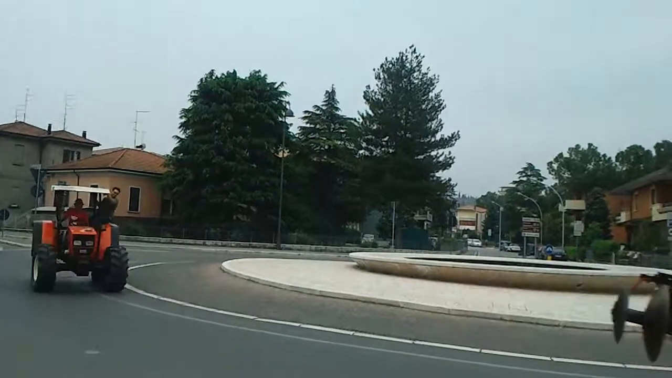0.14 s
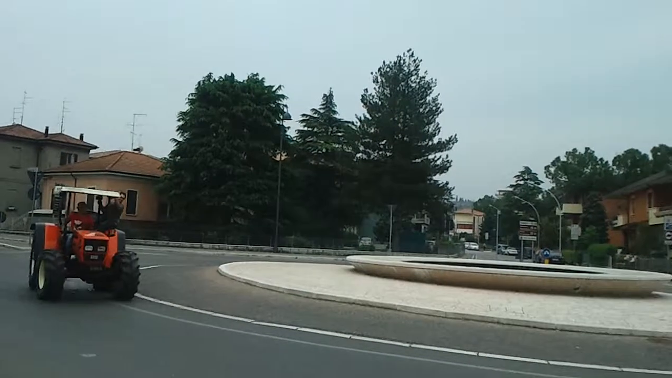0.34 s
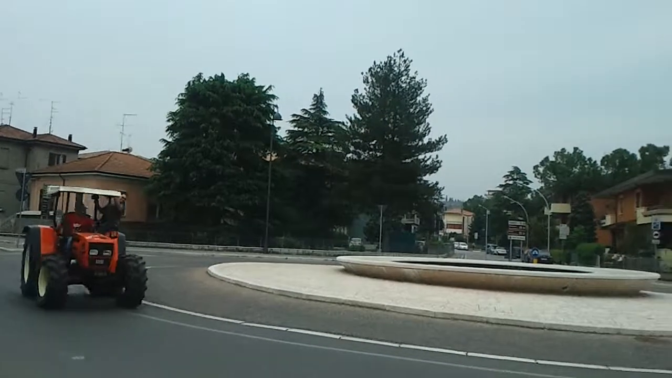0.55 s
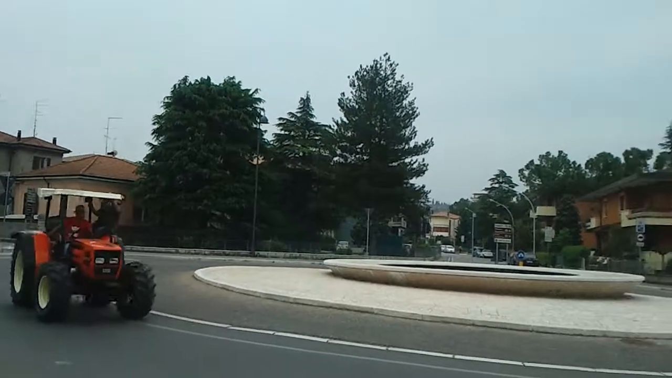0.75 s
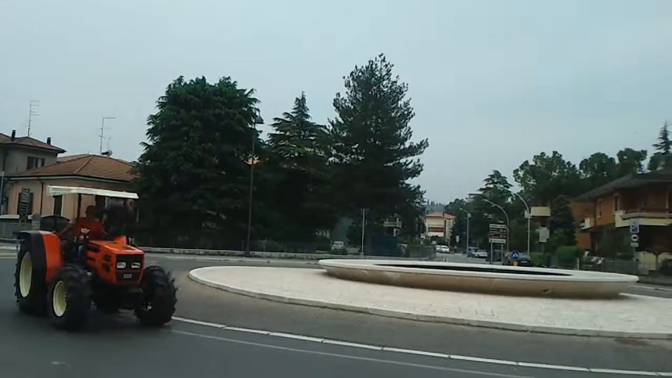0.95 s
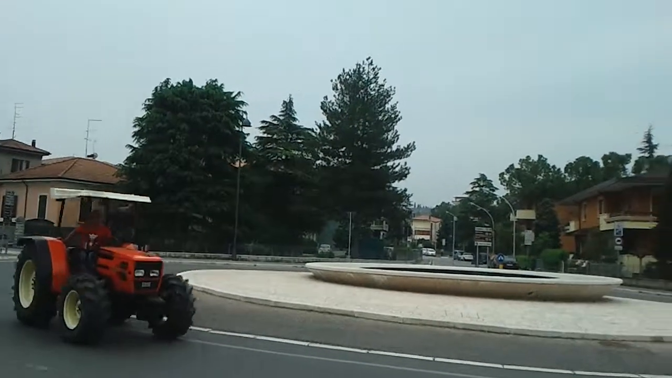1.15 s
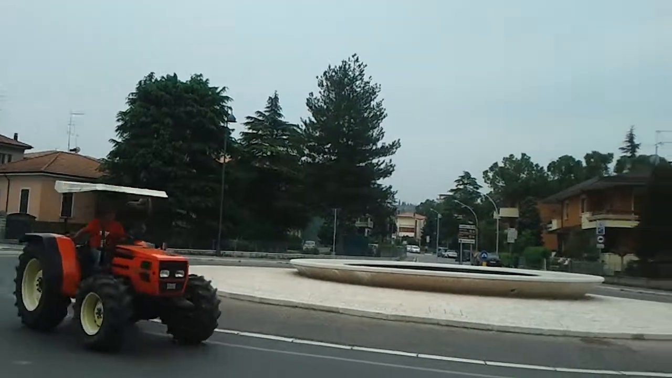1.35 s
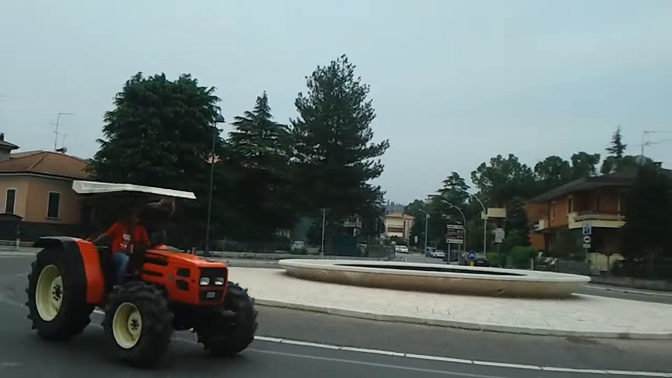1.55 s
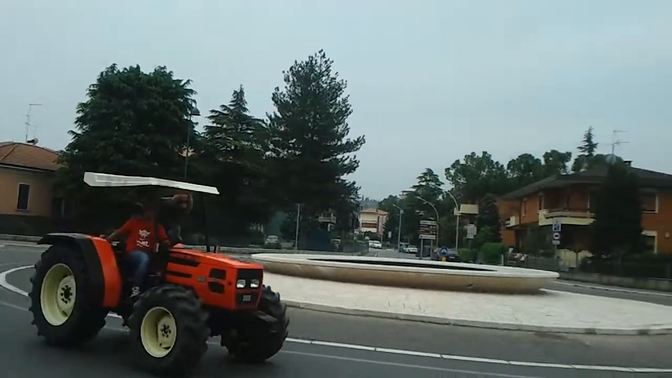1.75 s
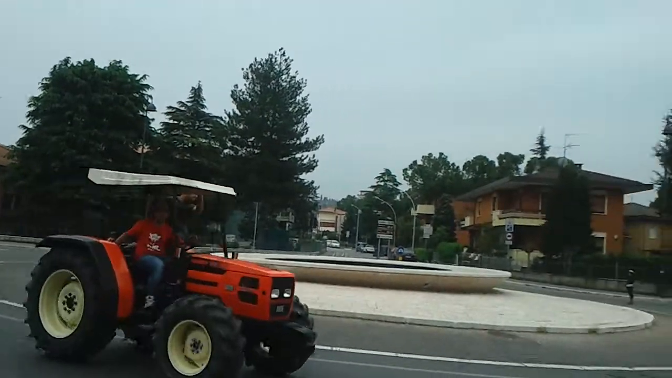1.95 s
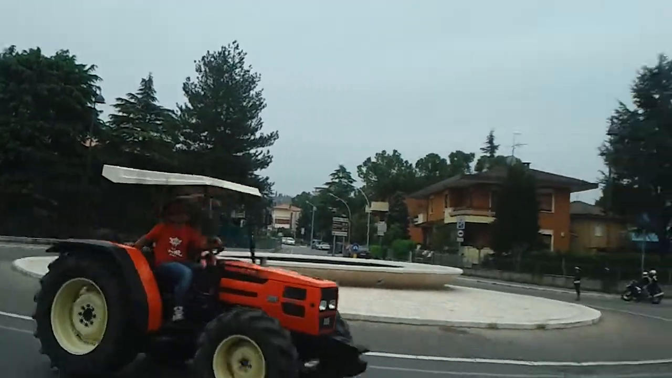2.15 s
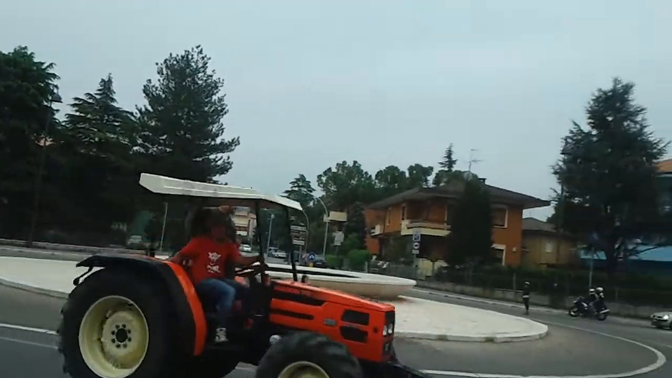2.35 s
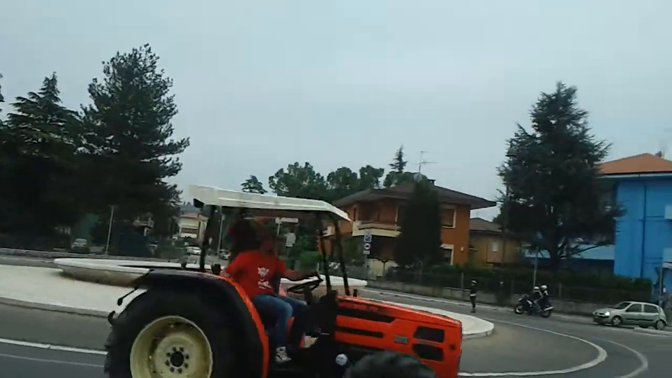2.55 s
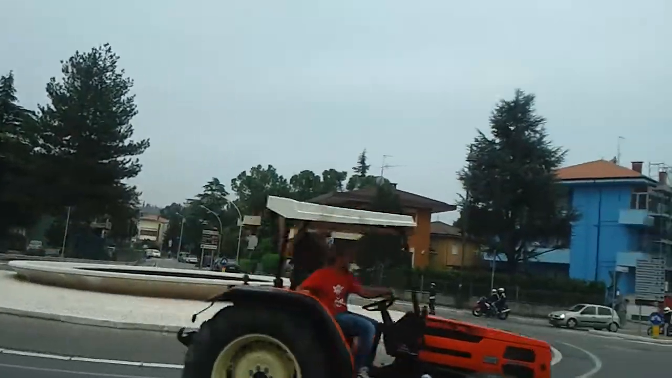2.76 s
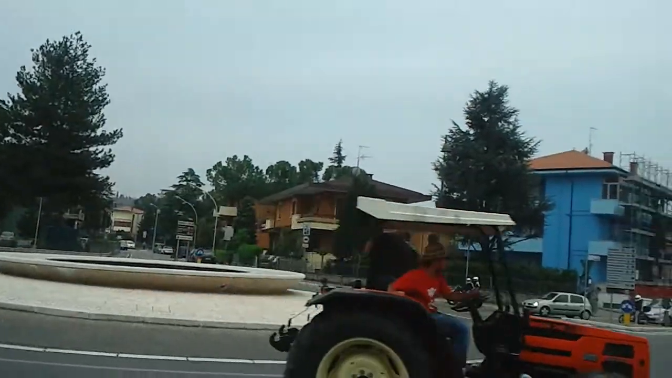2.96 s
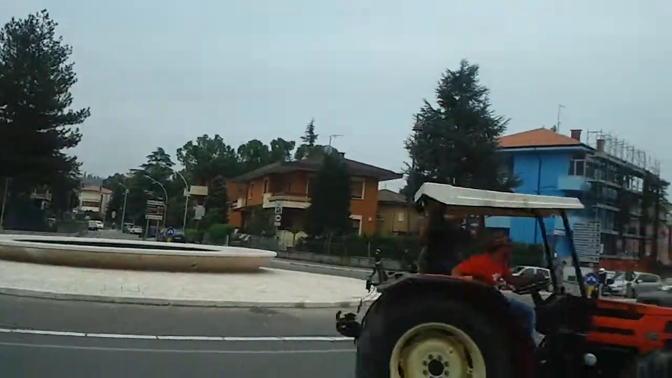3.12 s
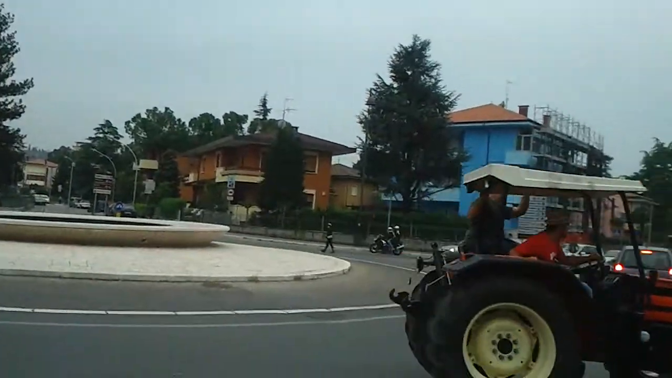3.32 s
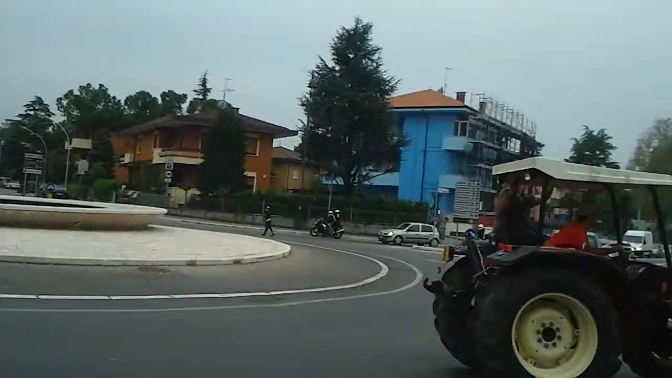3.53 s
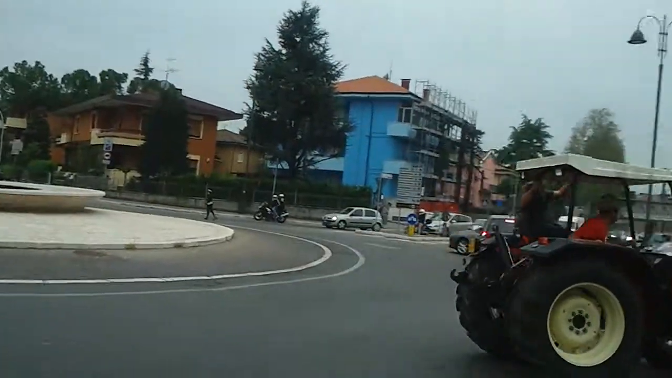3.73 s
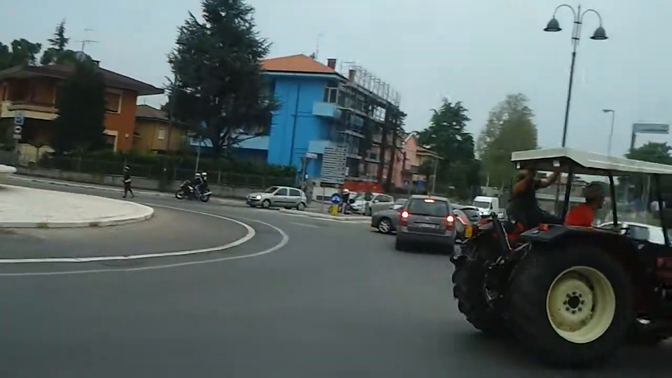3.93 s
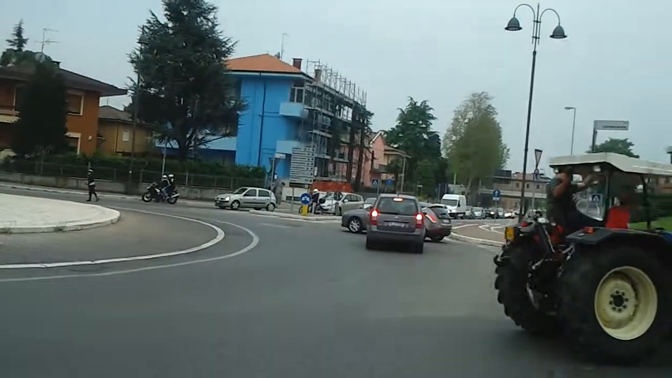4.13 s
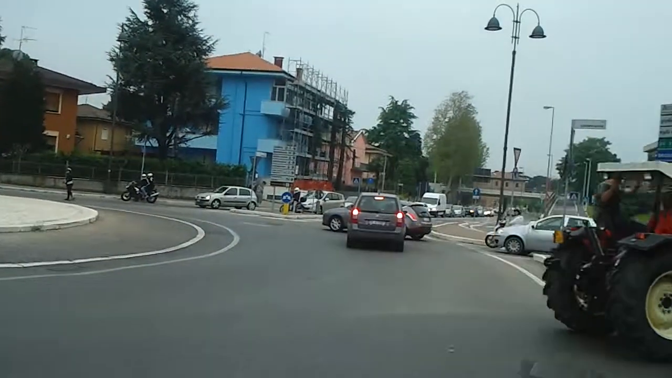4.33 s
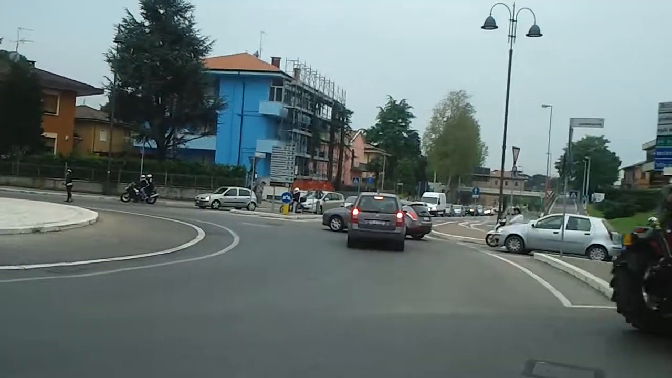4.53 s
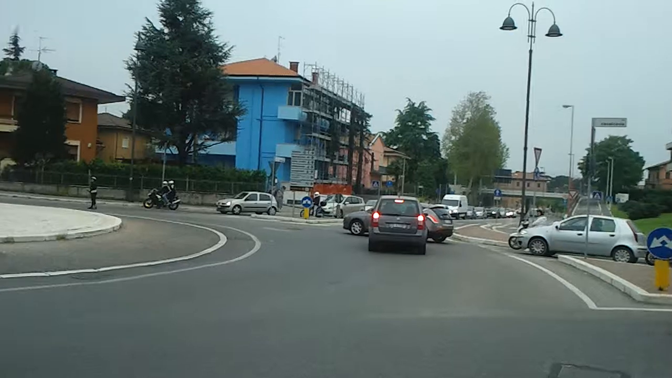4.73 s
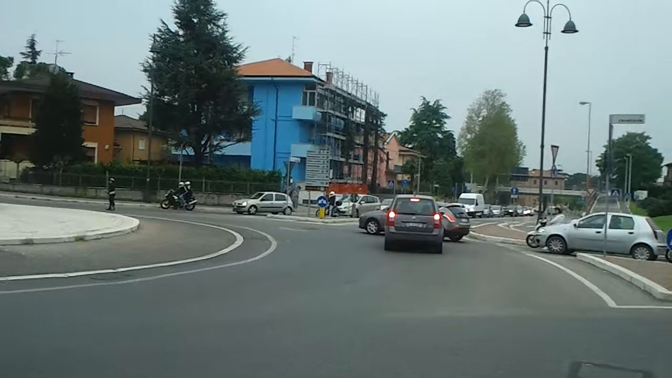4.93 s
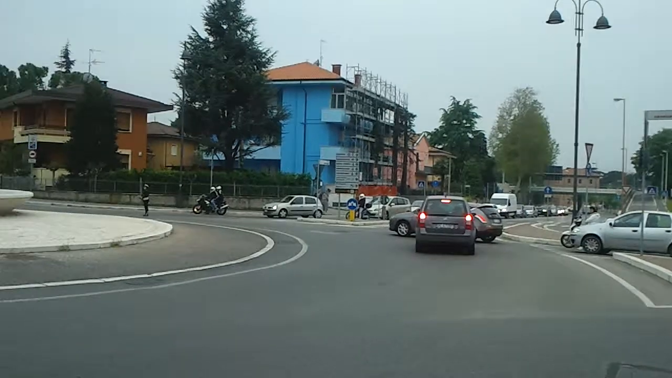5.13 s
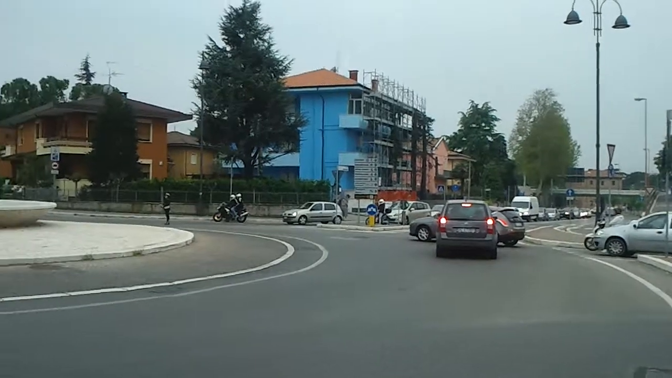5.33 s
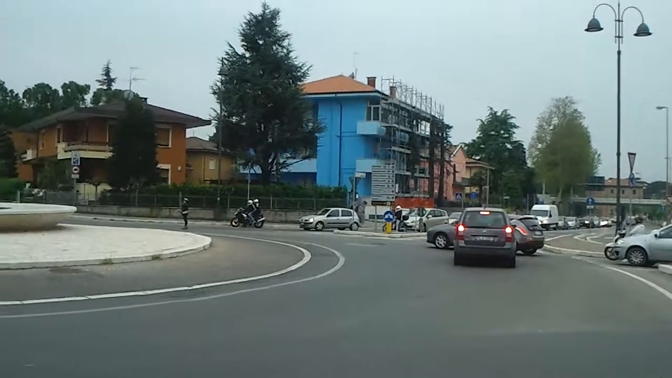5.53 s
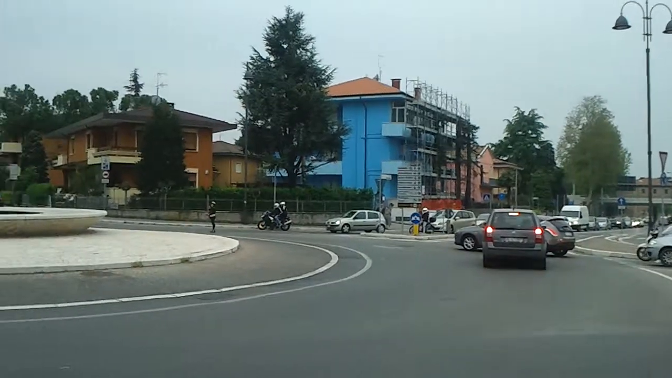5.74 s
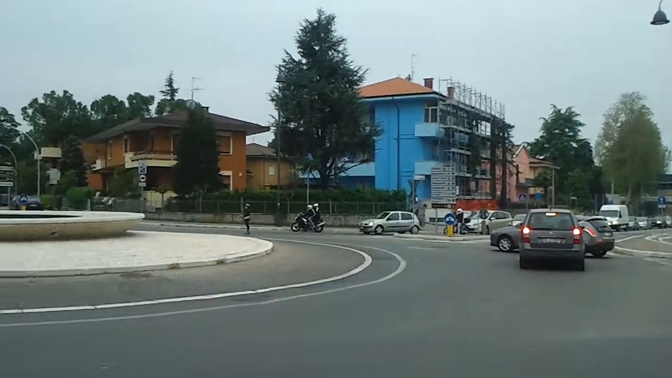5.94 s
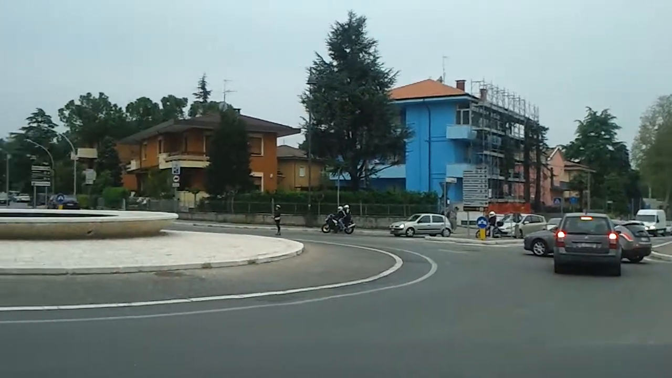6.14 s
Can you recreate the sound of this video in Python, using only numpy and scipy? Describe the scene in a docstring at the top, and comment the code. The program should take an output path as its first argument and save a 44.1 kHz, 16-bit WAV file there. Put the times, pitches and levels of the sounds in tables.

```python
"""Two diesel tractors passing

One tractor has just gone by: a nearly steady drone of exhaust harmonics, fading with distance.
A slower three-cylinder revs up, passes close and eases off: exhaust thumps, filtered noise for the
clattering block, sine whines for the gears. The engine notes beat together, ironwork clinks, the hitch
clanks once, distant traffic lies underneath, and the microphone input flattens the highest peaks."""
import sys
import numpy as np
from scipy import signal
from scipy.fft import rfft, irfft
from scipy.io import wavfile
from scipy.ndimage import uniform_filter1d, map_coordinates

SR = 44100
rng = np.random.default_rng(int(sys.argv[2]) if len(sys.argv) > 2 else 0)


def unload_audio(sound):
    """Save the sound as a 16-bit wav file, at the path given as the first command line argument."""
    columns = np.transpose(np.atleast_2d(sound))
    # keep every value between -1 and 1, then stretch to whole-number steps
    steps = np.round(np.clip(columns, -1, 1) * 32767)
    wavfile.write(sys.argv[1], SR, steps.astype(np.int16))


N = 276948
TIME = np.arange(N) / SR

# How the passing tractor is driven: (time [s], mean firing rate [Hz], throttle [0-1])
DRIVE = [(0, 43.23, .7), (.55, 42.64, .7), (.9, 40.85, .58), (1.15, 41.61, .65), (1.4, 43.1, .93),
         (1.75, 44.67, .74), (2, 45.03, .75), (2.3, 46.37, .92), (2.45, 48.07, 1), (2.58, 49.9, 1),
         (2.69, 50.6, .92), (2.76, 49, .3), (2.9, 47.1, .15), (3.2, 46.35, .2), (3.6, 43.21, .2),
         (3.85, 43.25, .74), (4.2, 41.98, .55), (4.5, 42.03, .38), (5.1, 41.35, .25), (5.55, 40.98, .2),
         (5.9, 42.19, .85), (6.28, 44.54, .6)]
# Its straight path past the microphone
CLOSEST_S, DISTANCE_M, SPEED_M_PER_S = 2.647, 5, 5.08
# Parts of its sound: (level abreast at full throttle [dB], change with throttle shut [dB],
# change towards straight ahead [dB], change towards straight behind [dB])
THUMP = [(-23, -0.5, -1.5, -8), (-15.5, -21, 3.5, -20), (-14, -23, -0.5, -0.5)]  # one row each for exhaust harmonics 1, 2 and 3
BARK = (-20.5, -13, -18, -10)  # gain of the upper exhaust harmonics
GAS = (-31.7, 1, -2.5, 0)
BODY = (-21.5, -3.5, 0.5, 2)
RATTLE = (-26, -3.5, -1.5, -10)
# Upper exhaust harmonics within the bark: (multiple of firing rate, relative level [dB])
OVERTONES = [(4, 1.5), (5, -2.5), (6, -5.5), (7, -10.5), (8, -14), (9, -17.5)]
LOW_CUT_HZ = 33  # the lowest harmonics run ahead in phase, as behind a low-cut here
THUMP_EARLY, KNOCK_LATE, CHUFF_LATE = .14, .09, .27  # timing, in shares of a firing
PUFF_DEPTH = .35  # pulsing of the gas at full throttle
KNOCK_IDLE, KNOCK_LOAD = 0.092, .16  # relative knock: throttle shut, and added at full throttle

# When each side faces the microphone, in the order used by block_colour: (time [s])
VIEW_TIMES = [.2, 1.2, 2.45, 3.2, 4.15, 5.0]
# Clatter colour from each side: (frequency [Hz], relative level per Hz [dB])
LEAD_REAR_COLOUR = [(310, -37), (520, -6), (702, -1), (937, -6.5), (1070, -0.5), (1240, -4.5), (1350, -5),
                    (1510, -5), (1730, -6), (1990, -10), (2410, -8), (3080, -14), (4290, -11),
                    (6190, -18.5), (7400, -34), (9620, -70), (16300, -120)]
FRONT_COLOUR = [(310, -34), (520, -10.5), (568, -14.5), (614, -4), (867, -0.5), (1210, -5.5), (1670, -1.5),
                (2110, -7.5), (2440, -5.5), (3220, -13), (4200, -6.5), (6060, -17.5), (7400, -38),
                (9620, -76.5), (16300, -120)]
FLANK_COLOUR = [(310, -48.5), (520, -19.5), (608, -5.5), (980, -1.5), (1120, -4), (1690, -8.5),
                (2410, -4.5), (3110, -10), (3400, -6), (3670, -9.5), (4490, -9), (6190, -18), (7400, -33.5),
                (9620, -77), (16300, -120)]
WHEEL_SIDE_COLOUR = [(310, -31.5), (520, -8.5), (776, -8.5), (1100, -4.5), (1560, -14.5), (1910, -11.5),
                     (2250, -14), (2550, -18), (3290, -11), (4150, -12.5), (4850, -15), (6620, -29),
                     (7400, -37), (9620, -71), (16300, -120)]
REAR_COLOUR = [(310, -27), (520, 2), (664, -4.5), (802, 2), (857, -6.5), (980, -1), (1870, -0.5),
               (2230, -4), (2880, -4.5), (3180, -20.5), (3970, -15), (7000, -31), (7400, -40), (9620, -66),
               (16300, -120)]
FAR_COLOUR = [(310, -32), (520, -4.5), (694, -8.5), (916, -5), (991, -9.5), (1240, -8.5), (1490, -7),
              (1850, -5.5), (2600, -8), (3630, -21.5), (4150, -20), (6260, -30), (7400, -45), (9620, -66),
              (16300, -120)]
# Passing coloured bands in the clatter, some gliding as the ground reflection shifts:
# (time [s], spread [s], frequency at that time [Hz], width [Hz], boost or cut [dB], glide [Hz/s])
PASSING_BANDS = [(.05, 0.34, 4220, 248, 8, -1), (1.5, 1, 2460, 110, 3, -1), (1.65, .25, 860, 35, 5, -68),
                 (4.52, 0.28, 1280, 150, 3.5, 0), (2.45, .2, 3380, 55, 6, 450),
                 (2.9, .45, 4680, 70, 7.5, 520), (2.68, .15, 3760, 90, 4.5, 0),
                 (3.1, .35, 3700, 90, 4.5, 550), (3.19, .13, 1830, 120, 9, 1), (3.42, .14, 2200, 150, 8, 0),
                 (3.54, 0.081, 1970, 82, 9, -600), (2.6, 0.12, 2150, 80, -2.5, -600),
                 (3.42, 0.23, 900, 35, 7, -330), (2.06, 0.12, 3370, 50, 7.5, -300),
                 (2.5, .1, 2000, 90, 4.5, -600), (2.61, 0.11, 1300, 60, 8.5, 1.5),
                 (3.85, 0.21, 2500, 70, 7.5, -1), (4.3, 0.45, 2870, 75.6, 7.5, 1),
                 (5.0, 0.83, 1900, 170, 3.5, 0.5), (5.95, .35, 4200, 220, 3, 2)]
# Clatter chuffs with the firings, heard from behind: (time [s], spread [s], depth [0-1])
REAR_CHUFF = (4.4, .6, .12)

# Main gear pitch, following road speed: (time [s], mean frequency [Hz])
GEAR_PITCH = [(1.5, 1000), (1.8, 1014), (1.97, 1019), (2.25, 1046), (2.42, 1066), (2.66, 1110), (2.8, 1097),
              (2.92, 1072), (3.05, 1076), (3.22, 1056), (3.42, 1018), (4, 968), (4.22, 951), (4.42, 960),
              (4.8, 945), (5.1, 941), (5.5, 929)]
SHRILL_RATIO = 3.163  # faster gear's pitch over the main one
# Beams of the gear whines, before flutter and fading: (time [s], spread [s], level [dB])
WHINE = [(1.89, .16, -28.5), (2.32, .12, -27), (2.72, .14, -29.5), (3.14, .16, -28.5), (4.4, .45, -37.5),
         (5.2, .35, -36.5)]
SHRILL_WHINE = [(2.45, .15, -32.5), (3.05, .2, -34)]
WHINE_OCTAVE = (4.9, 0.79, -40.5)
WHINE_TWELFTH = (4.3, 0.38, -39)

CLANK_S = 3.6645
# Modes of the hitch dropping on its stop:
# (frequency [Hz], level before the attack [dB], 60 dB decay [s])
HITCH = [(140, -9, .04), (330, -9.5, .02), (560, -9.5, .018), (860, -9, .014), (1150, -3, .018),
         (1480, -6, .014)]
# Loose ironwork: (time [s], main ring level before the attack [dB], frequency [Hz], 60 dB decay [s])
CLINKS = [(1.237, -19, 5260, .022), (1.375, -18.5, 5200, .027), (1.519, -21, 5606, .024),
          (1.739, -24, 5940, .019), (2.115, -22, 6600, .021), (2.249, -12, 4610, .019),
          (2.439, -19, 6360, .029), (3.176, -21, 5080, .026), (3.764, -21, 5270, .015),
          (3.768, -11, 4150, .012), (3.769, -8, 4390, 0.017), (3.77, -28, 6700, .02),
          (4.203, -28, 5300, 0.034), (4.209, -22, 4194, .025), (4.211, -28.5, 6980, .04),
          (5.051, -46, 7120, .037)]

# Revs of the leading tractor: (time [s], mean firing rate [Hz])
LEAD_SPEED = [(0, 94.9), (.25, 95.86), (.55, 95.65), (1.1, 96.12), (1.6, 96.8), (2.3, 96.68), (3, 95.39),
              (3.6, 96.3), (4.3, 95.94), (5, 95.59), (5.6, 95.44), (6.28, 95.73)]
LEAD_DOUBLING_S = 2.07  # time to twice its starting distance
# When its rear faces the microphone: (time [s], spread [s])
REAR_FACING = (0.52, 0.33)
# Parts of its sound: (level at starting distance [dB], change per doubling of distance [dB],
# change with the rear facing us [dB])
LEAD_DRONE = (-16.5, -5, 0.92)
LEAD_RASP = (-34.5, -6, 9.1)
LEAD_GAS = (-28, -7.5, -1)
LEAD_BODY = (-21, -12, -.5)
LEAD_RATTLE = (-25.5, -16.5, -1)
LEAD_WHINE = (-46, -10, 16.5)
# Its second harmonic, before the lift in leading_exhaust: (time [s], level [dB])
LEAD_OCTAVE = [(0.0, -31), (0.44, -25), (0.82, -38), (0.98, -31.5), (2.2, -26.5), (3.1, -26.5),
               (5.51, -39.5), (6.28, -49)]
# Its rasp, in thirds where the cylinders differ: (multiple of firing rate, relative level [dB])
LEAD_ORDERS = [(1 / 3, -11), (2 / 3, -6), (4 / 3, -4), (5 / 3, -4), (3, -3.3), (11 / 3, -10), (4, -.5),
               (5, -13), (6, -12)]
WAVER, WAVER_PER_S = .08, .032  # drone waver: starting depth, and depth added per second
LEAD_GEAR_ORDER = 12.5  # whine cycles per firing

# Exhaust gas noise: (frequency [Hz], relative level per Hz [dB])
RUMBLE = [(15, -13.5), (30, -5), (55, -5.5), (120, 1.5), (175, 2.7), (240, 0.7), (330, -2), (410, -3),
          (480, -5), (560, -12.5), (750, -54.5)]
# Boom of the surrounding traffic: (frequency [Hz], relative level per Hz [dB])
BOOM = [(15, -24), (30, -9), (50, -4.5), (70, 4.5), (90, 0), (125, -5), (170, -8.5), (300, -50)]
BOOM_DB = -33.5  # between the bass swells
# Brief bass swells, in full on the passing exhaust note: (time [s], spread [s], boost [dB])
BASS_SWELLS = [(3.6, .4, 2), (4.95, .1, 7.5), (5.81, .05, 4.5), (6.08, .1, 4)]
# Surrounding traffic noise: rumble (between the swells), clatter and its treble
STREET_GAS_DB, STREET_BODY_DB, STREET_RATTLE_DB = -43.5, -36.5, -44.5

OVERLOAD = 0.4  # peak amplitude the input approaches
EDGE_HZ = 7600  # upper band limit


def passing_exhaust(turns):
    """Slow, heavy pulses: harmonics line up in one thump a firing, the higher ones rougher."""
    firing_hz = curves(DRIVE)[0]

    def harmonic(k, rough):
        """One exhaust harmonic with a wavering level and the low-cut's phase lead."""
        ahead = np.arctan(LOW_CUT_HZ / (k * firing_hz))
        phase = 2 * np.pi * k * (turns + THUMP_EARLY) + ahead
        return -(1 + rough * wander(10)) * np.cos(phase)

    note = sum(passing(*part) * harmonic(k, rough=0.053) for k, part in enumerate(THUMP, 1))
    rasp = sum(amp(db) * harmonic(k, rough=0.15) for k, db in OVERTONES)
    return amp(bass_swell_db()) * note + passing(*BARK, narrowness=1.2) * rasp


def clatter(turns, lead_turns):
    """Combustion knocks and valve ticks excite the block, whose colour turns with the tractor."""
    knock_depth = KNOCK_IDLE + KNOCK_LOAD * throttle()
    knocks = knock_depth * bursts(turns - KNOCK_LATE, decay=0.4, uneven_db=5.0)
    chuff = swell(*REAR_CHUFF) * np.cos(2 * np.pi * (turns - CHUFF_LATE))
    lead_knocks = 0.019 * bursts(lead_turns, decay=0.25, uneven_db=-3.0)
    pulsing = np.maximum(1 + 0.45 * knocks + chuff + lead_knocks, .1)

    # Random ticks, about 500 a second
    ticks = (rng.random(N) < 500 / SR) * rng.uniform(-0.99, 1, N)
    impacts = rng.standard_normal(N) + .75 * cycle_pattern(turns) + 0.37 * unit(ticks)

    hz, t, spectrum = signal.stft(impacts * pulsing, SR, nperseg=1024, noverlap=768)
    coloured = spectrum * amp(block_colour(hz, t))
    sound = signal.istft(coloured, SR, nperseg=1024, noverlap=768)[1][:N]

    body, rattle = band(sound, 430, 3000), band(sound, 3000, 9000)
    body_gain = together(passing(*BODY), leaving(*LEAD_BODY), amp(STREET_BODY_DB))
    rattle_gain = together(passing(*RATTLE), leaving(*LEAD_RATTLE), amp(STREET_RATTLE_DB))
    return body_gain * body / running_rms(body) + rattle_gain * rattle / running_rms(rattle)


def cycle_pattern(turns, size=3000):
    """Valves, injectors and pistons repeat one pattern of impacts every three firings."""
    pattern = rng.standard_normal(size)
    position = turns / 3 % 1 * size
    return unit(map_coordinates(pattern, [position], order=1, mode="grid-wrap"))


def block_colour(hz, t, lobes_db=1.0):
    """dB by frequency and time: the side facing us, passing bands, some gliding, and slow random lobes."""
    views = [LEAD_REAR_COLOUR, FRONT_COLOUR, FLANK_COLOUR, WHEEL_SIDE_COLOUR, REAR_COLOUR, FAR_COLOUR]
    # Each view crossfades into the next
    shares = [np.interp(t, VIEW_TIMES, one_hot) for one_hot in np.eye(len(views))]
    colour_db = sum(np.outer(read(view, hz), share) for view, share in zip(views, shares))

    for s, spread, centre_hz, width_hz, db, glide in PASSING_BANDS:
        off_hz = hz[:, None] - centre_hz - glide * (t - s)
        colour_db += db * np.exp(-(off_hz / width_hz) ** 2 - ((t - s) / spread) ** 2)

    lobes = uniform_filter1d(rng.standard_normal(colour_db.shape), size=2, axis=0)
    lobes = uniform_filter1d(lobes, size=45, axis=1)
    return colour_db + lobes_db * unit(lobes)


def passing_gears():
    """Two gears in one transmission rise and fall together; the main one has two overtones."""
    meshes = crank(curves(GEAR_PITCH)[0], jitter=0.00064)
    partials = [WHINE, [WHINE_OCTAVE], [WHINE_TWELFTH]]
    low = sum(gears(meshes, k, beams(*rows)) for k, rows in enumerate(partials, 1))
    return low + gears(meshes, SHRILL_RATIO, beams(*SHRILL_WHINE))


def gears(turns, teeth, gain, flutter=0.25, fading_db=2.6):
    """Teeth sing at a multiple of shaft speed, fluttering with the backlash and fading in and out."""
    mesh = 2 * np.pi * teeth * turns + flutter * wander(25)
    tone = np.sin(mesh) + amp(-16.5) * np.sin(2 * mesh)
    fading = unit(amp(fading_db * np.tanh(wander(4.2))))
    return gain * fading * (1 + flutter * wander(8.9)) * tone


def hitch(attack_s=0.00063):
    """The hitch drops against its stop: its decaying modes make a thud under a short ring."""
    t = np.maximum(TIME - CLANK_S, 0)
    modes = sum(amp(db - 60 * t / t60) * np.sin(2 * np.pi * hz * t) for hz, db, t60 in HITCH)
    return -(1 - np.exp(-t / attack_s)) * modes


def ironwork(scrape=.07, clang=0.27):
    """Links and pins jolt: a brief main ring, a cluster of weaker modes round it and a scrape."""
    out, t = np.zeros(N), np.arange(SR // 10) / SR
    for s, db, hz, t60 in CLINKS:
        cluster_hz = hz * rng.uniform(.88, 1.35, size=8)
        cluster = np.sin(2 * np.pi * np.outer(cluster_hz, t)).sum(0)
        ring = np.sin(2 * np.pi * hz * t) + clang * unit(cluster)
        ring += scrape * rng.standard_normal(len(t))
        hit = amp(db - 60 * t / t60) * (1 - np.exp(-t / 0.00069)) * ring
        part = out[round(s * SR):][:len(t)]
        part += hit[:len(part)]  # writes into out
    return out


def leading_exhaust(turns, octave_db=2.5):
    """A drone of two wavering harmonics, with weak side orders from unequal cylinders."""
    gains = leaving(*LEAD_DRONE), amp(curves(LEAD_OCTAVE)[0] + octave_db)
    depth = WAVER + WAVER_PER_S * TIME
    note = 0
    for k, gain in enumerate(gains, 1):
        phase = 2 * np.pi * (k * turns - (k - 1) / 4)
        note = note + gain * (1 + depth * wander(9)) * np.cos(phase)

    rasp = 0
    for k, db in LEAD_ORDERS:
        phase = 2 * np.pi * (k * turns + rng.random())
        rasp = rasp + amp(db) * (1 + 0.2 * wander(7.5)) * np.cos(phase)
    return note + leaving(*LEAD_RASP) * rasp


def rumble(turns, swell_share=.3, boom_share=0.49):
    """Turbulent gas leaves the pipe in puffs, over the boom of the surrounding traffic."""
    hz = np.fft.rfftfreq(N, 1 / SR)
    pulses = bursts(turns + THUMP_EARLY, decay=0.41, uneven_db=1.5)
    puffs = rng.standard_normal(N) * (1 + PUFF_DEPTH * throttle() * pulses)
    gas = irfft(rfft(puffs) * amp(read(RUMBLE, hz)), N)
    boom = irfft(rfft(rng.standard_normal(N)) * amp(read(BOOM, hz)), N)

    # Gas levels refer to its 236-462 Hz band; gas and boom take part of the bass swells
    gas_gain = together(passing(*GAS), leaving(*LEAD_GAS), amp(STREET_GAS_DB))
    gas_gain = gas_gain * amp(swell_share * bass_swell_db())
    boom_gain = amp(BOOM_DB + boom_share * bass_swell_db())
    return gas_gain * gas / running_rms(band(gas, 236, 462)) + boom_gain * unit(boom)


def crank(firing_hz, jitter):
    """Counts cycles of a rate (firings or gear meshes) that hunts slightly."""
    return np.cumsum(firing_hz * (1 + jitter * wander(10.9))) / SR


def bursts(turns, decay, uneven_db):
    """One dying burst a firing, each of its own strength; mean 0, rms 1."""
    chance = np.clip(rng.standard_normal(4096), -1.6, 1.6)
    strength = amp(uneven_db * chance)[turns.astype(int) % 4096]
    shape = uniform_filter1d(strength * np.exp(-(turns % 1) / decay), 30)
    return unit(shape - shape.mean())


def throttle():
    """How hard the passing tractor pulls, 0-1."""
    return np.clip(curves(DRIVE)[1], 0, 1)


def passing(db, shut_db, ahead_db, behind_db, narrowness=3.1):
    """Gain of a passing part: 1 / distance, throttle, and the end that it turns to us."""
    along = SPEED_M_PER_S * (TIME - CLOSEST_S)
    distance = np.hypot(along, DISTANCE_M)
    end_db = np.where(along < 0, ahead_db, behind_db)
    facing_db = end_db * abs(along / distance) ** narrowness
    return amp(db + shut_db * (1 - throttle()) + facing_db) * DISTANCE_M / distance


def leaving(db, doubling_db, rear_db):
    """Gain of a leading part: it falls with distance and changes as the rear swings past."""
    doublings = np.log2(1 + TIME / LEAD_DOUBLING_S)
    return amp(db + doubling_db * doublings + rear_db * swell(*REAR_FACING))


def beams(*rows):
    """Gain of a whine whose beams sweep past the microphone."""
    return sum(amp(db) * swell(s, spread) for s, spread, db in rows)


def bass_swell_db():
    """All the swells of the bass, in dB."""
    return sum(swell(*row) for row in BASS_SWELLS)


def swell(s, spread, height=1):
    """A smooth rise and fall around one moment."""
    return height * np.exp(-((TIME - s) / spread) ** 2)


def together(*gains):
    """Unrelated noises add in power."""
    return np.sqrt(sum(g ** 2 for g in gains))


def amp(db):
    """Decibels to gain."""
    return 10 ** (np.asarray(db) / 20)


def unit(x):
    """Scales to rms 1."""
    return x / np.sqrt(np.mean(x ** 2) + 1e-20)


def curves(rows, t=TIME):
    """Each column of a table, joined by straight lines in time."""
    s, *columns = np.transpose(rows)
    return [np.interp(t, s, c) for c in columns]


def read(points, hz):
    """A spectrum in dB, interpolated on a log-frequency axis."""
    f, db = np.transpose(points)
    return np.interp(np.log(hz + 1), np.log(f + 1), db)


def wander(hz):
    """Slow random motion of rms 1, up to about this rate."""
    f = np.fft.rfftfreq(N, 1 / SR)
    return unit(irfft(rfft(rng.standard_normal(N)) * np.exp(-(f / hz) ** 2), N))


def band(x, lo_hz, hi_hz):
    """The part of x between two frequencies."""
    f = np.fft.rfftfreq(N, 1 / SR)
    return irfft(rfft(x) * ((f >= lo_hz) & (f < hi_hz)), N)


def running_rms(x):
    """Level over a quarter of a second."""
    return np.sqrt(uniform_filter1d(x ** 2, SR // 4) + 1e-20)


def scene():
    """Both tractors, each exhaust locked to its own crankshaft, with ironwork and traffic."""
    turns = crank(curves(DRIVE)[0], jitter=0.00071)
    lead_turns = crank(curves(LEAD_SPEED)[0], jitter=0.00078)
    passing_tractor = passing_exhaust(turns) + passing_gears() + hitch() + ironwork()
    lead_whine = gears(lead_turns, LEAD_GEAR_ORDER, leaving(*LEAD_WHINE))
    leading_tractor = leading_exhaust(lead_turns) + lead_whine
    shared_noise = clatter(turns, lead_turns) + rumble(turns)  # both tractors and the traffic
    return (passing_tractor + leading_tractor + shared_noise)[None]


def record(dry):
    """The input flattens the highest peaks; then a dull top end and the band limit."""
    clipped = dry / (1 + (dry / OVERLOAD) ** 12) ** (1 / 12)
    hz = np.fft.rfftfreq(N, 1 / SR)
    dulled = irfft(rfft(clipped) / np.sqrt(1 + (hz / 6900) ** 9), N)
    low_pass = signal.firwin(255, EDGE_HZ, window=("kaiser", 9), fs=SR)
    return signal.oaconvolve(dulled, low_pass[None], "same")


dry = scene()
out = record(dry)
unload_audio(out)
```